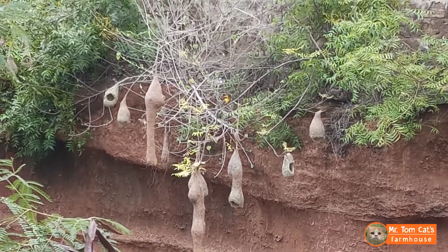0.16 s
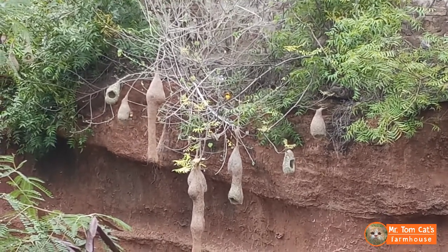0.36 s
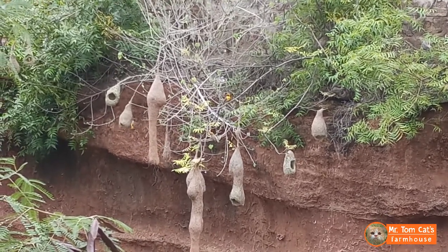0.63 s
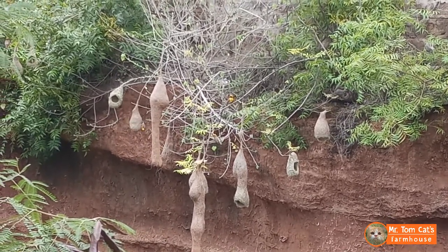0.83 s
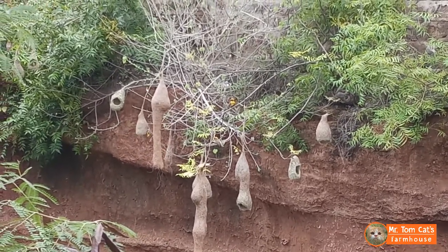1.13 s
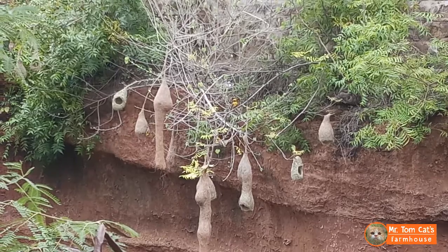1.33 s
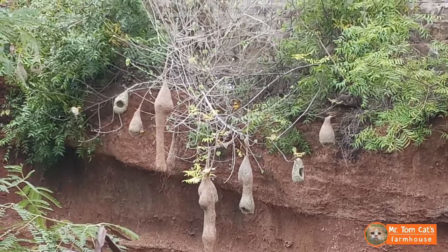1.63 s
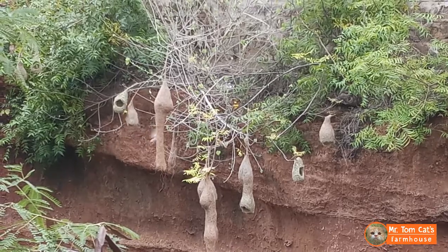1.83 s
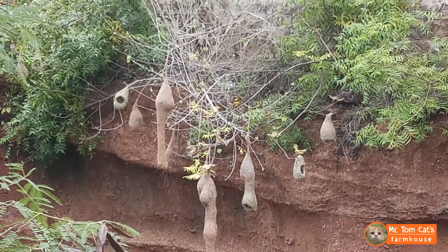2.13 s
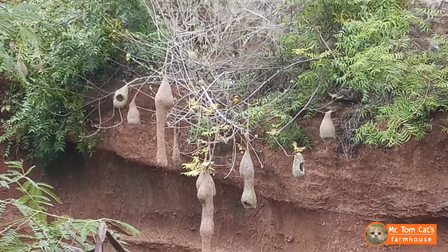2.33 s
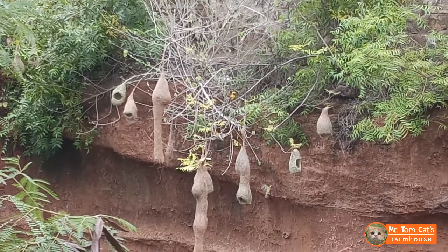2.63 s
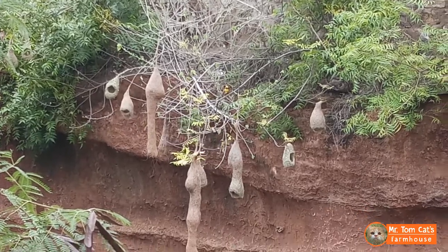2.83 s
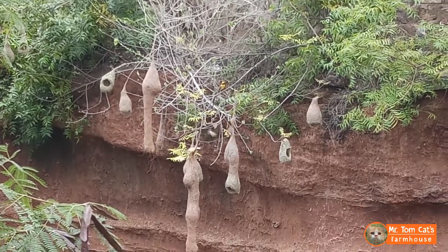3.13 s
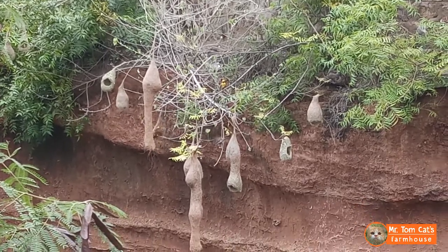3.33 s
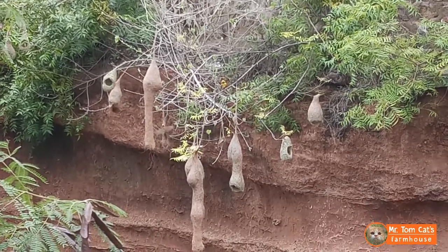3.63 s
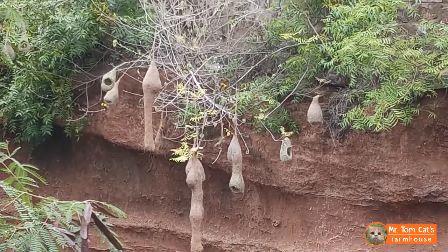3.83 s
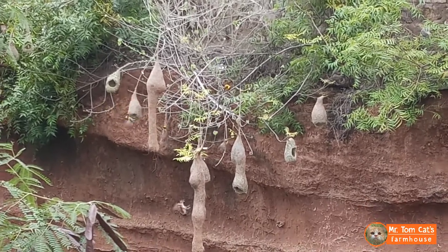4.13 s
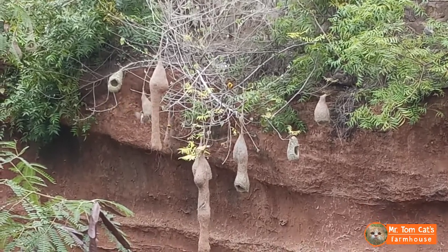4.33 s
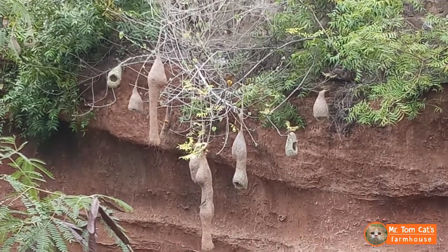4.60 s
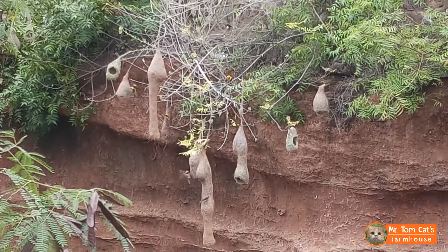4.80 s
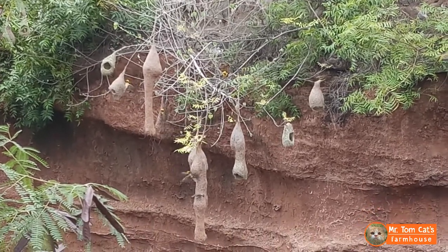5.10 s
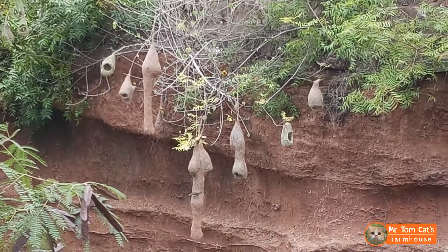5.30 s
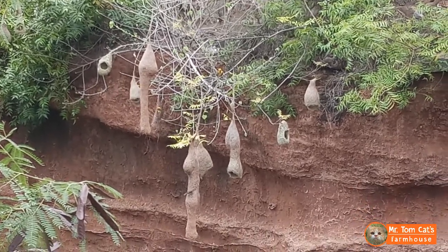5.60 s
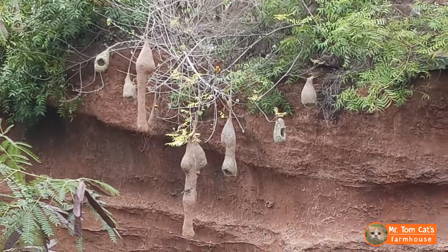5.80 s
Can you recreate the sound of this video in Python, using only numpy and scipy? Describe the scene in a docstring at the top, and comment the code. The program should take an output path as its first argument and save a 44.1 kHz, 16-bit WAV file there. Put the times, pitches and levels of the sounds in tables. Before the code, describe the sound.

After a faint, almost birdless opening, a small bird colony scolds in fast raspy notes, later adding sharp sliding whistles, with short outdoor echo.

```python
"""Weaver birds on a thorn bush scold in harsh chatter notes: stacks of partials that break into rasping noise.
Falling and rising whistles are frequency-modulated tones, roughened by fast random flutter.
Birds behind are a stream of similar chits over a low wash of noise.
Insects and leaves far off are shaped noise; light wind on the microphone is lumpy low noise, with one tick.
An earth bank and bushes return an echo: noise tails whose decay time depends on frequency."""
import sys
import numpy as np
from scipy import signal
from scipy.fft import rfft, irfft, next_fast_len
from scipy.io import wavfile
from scipy.ndimage import uniform_filter1d, map_coordinates

SR = 44100
rng = np.random.default_rng(int(sys.argv[2]) if len(sys.argv) > 2 else 0)


def file_out(sig):
    """Save sig as 16-bit WAV at sys.argv[1]."""
    # one column per channel
    cols = np.atleast_2d(sig).T
    # limit, then scale
    lim = np.clip(cols, -1, 1)
    pcm = np.round(lim * 32767).astype(np.int16)
    wavfile.write(sys.argv[1], SR, pcm)


N = 262395  # samples

# near chatter notes: (t/s, middle-band level/dB, starting f/Hz, low-band level/dB re middle, decay length/s)
CHATTER_NOTES = [(1.3603, -42, 3160, -3.5, 0.07), (1.398, -44.5, 3200, 6.5, 0.063),
                 (1.4384, -46.5, 3250, 11.5, 0.058), (1.4794, -47.5, 3260, 2, 0.042),
                 (1.515, -65, 3080, 6, 0.042), (1.586, -40.5, 3080, -4.5, 0.053),
                 (1.62, -46.5, 3080, -2.5, 0.081), (1.6645, -41.5, 3110, -3, 0.039),
                 (1.736, -28, 2980, -18, 0.044), (1.784, -26.5, 3190, -11, 0.055),
                 (1.865, -24, 3085, -15, 0.046), (1.915, -26, 3130, -14.5, 0.058),
                 (2.0037, -27.5, 3100, -12.5, 0.066), (2.06, -29.5, 2990, -12, 0.057),
                 (2.144, -28.5, 3110, -11, 0.071), (2.2007, -24, 3020, -16.5, 0.039),
                 (2.2814, -23.5, 3110, -15, 0.057), (2.3363, -21.5, 3163, -15, 0.047),
                 (2.426, -22, 3067, -14, 0.041), (2.473, -23.5, 2990, -13.5, 0.039),
                 (2.5753, -26, 3120, -12, 0.047), (2.629, -24.5, 3304, -9.5, 0.05),
                 (2.714, -26, 3086, -9, 0.049), (2.791, -27, 3054, -13.5, 0.042),
                 (2.847, -34, 2920, -23, 0.08), (2.888, -31.5, 3050, -8.5, 0.065),
                 (2.9944, -29.5, 3165, -10.5, 0.053), (3.043, -28, 3220, -11, 0.072),
                 (3.101, -28, 3050, -13, 0.051), (3.14, -30.5, 3010, -28, 0.034),
                 (3.22, -28, 3320, -13.5, 0.071), (3.272, -24.5, 3150, -11, .057),
                 (3.367, -26.5, 3130, -10.5, 0.051), (3.4697, -26.5, 3150, -11.5, 0.06),
                 (3.517, -40.5, 3270, 4.5, 0.085), (3.558, -25.5, 3240, -17, 0.038),
                 (3.633, -26, 3310, -11, 0.061), (3.694, -34.5, 3370, -2.5, 0.071),
                 (3.741, -35, 3370, -10, 0.085), (3.8414, -35.5, 3150, -3.5, 0.1),
                 (3.882, -27, 3370, -10, 0.017), (3.974, -35, 3100, -1.7, 0.076),
                 (4.035, -34, 3050, -7, 0.096), (4.077, -28, 3194, -11, 0.06),
                 (4.1925, -26.5, 3310, -8, 0.068), (4.244, -27.5, 3004, -6, 0.044),
                 (4.347, -35.5, 3245, -2.5, 0.14), (4.418, -40.5, 3160, 4, 0.12),
                 (4.4946, -28.5, 3280, -8, 0.061), (4.549, -41, 3370, 9, .049),
                 (4.595, -27, 3280, -7, 0.08), (4.632, -30.5, 3480, -3.5, .1),
                 (4.708, -24, 3400, -10, .053), (4.745, -28, 3300, -11, 0.061),
                 (4.886, -28.5, 3450, -19, 0.05), (4.935, -27, 3380, -4, .038),
                 (5.098, -28, 3220, -5.5, 0.041), (5.147, -38, 3000, -17, .071),
                 (5.364, -29, 2960, -11, 0.061), (5.4044, -30, 3640, 0.5, 0.06),
                 (5.4773, -22.5, 3640, -11.5, 0.093), (5.524, -28, 3370, -5.5, 0.055),
                 (5.586, -25.5, 3350, -37, 0.07), (5.6294, -29, 3350, -28, 0.051),
                 (5.788, -27, 3350, -11, 0.1), (5.856, -33, 3430, -22, 0.041), (5.9166, -32, 3370, -5, 0.1)]
# drift of the scolding voice: (t/s, treble level/dB re middle before dulling, hoarseness clipped to 0-1, rise/s)
VOICE_DRIFT = [(1.36, -32, 0.96, 0.0084), (1.44, -14, 0.68, .013), (1.58, -23.5, 0.97, 0.008),
               (1.68, -30, 0.87, 0.014), (1.73, -21.5, 0.37, 0.0025), (1.92, -25, 0.05, 0.0093),
               (2.03, -20.5, 0.63, 0.0053), (2.2, -23, 0.5, 0.0045), (2.28, -21.5, 0.52, .009),
               (2.42, -21, 0.66, 0.0015), (2.65, -23, 0.3, .005), (2.85, -20.5, 0.5, 0.0049),
               (3.15, -21, 0.59, 0.0082), (3.45, -31, 0.75, 0.012), (3.6, -19.5, 0.4, .008),
               (3.72, -24, 0.9, 0.013), (4.2, -22, 0.92, 0.013), (4.75, -18, 1.03, 0.011),
               (5.15, -12, 1.16, 0.011), (5.5, -21, 1, 0.0088), (5.63, -14.5, .9, 0.0091),
               (5.85, -16.5, 1.07, 0.012), (5.95, -14, 0.8, .01)]
FULL_S, DULLING_DB_PER_S = 0.044, 900  # a note shorter than this loses treble
LEAD_S = 0.005  # each note starts this long before its listed time


def chatter():
    """Near scolding by superposition of separate notes, their timbre interpolated through the bout."""
    track = np.zeros(N)
    for s, db, hz, low_db, length in CHATTER_NOTES:
        treble_db, hoarse, rise = curves(VOICE_DRIFT, s)
        treble_db = treble_db - DULLING_DB_PER_S * max(FULL_S - length, 0)
        add(track, s - LEAD_S, amp(db) * note(low_db, treble_db, hz, rise, length, hoarse))
    return track


# spectral colour of the voice: (f/Hz, relative level/dB)
VOICE_COLOUR = [(710, -88), (1200, -27), (2380, -17), (2650, -15), (3020, -14), (3820, -7.5), (4210, -2),
                (4940, -1), (5320, -3.5), (6320, -4), (6810, -10), (8260, -14.5), (9600, -28), (12000, -30),
                (15600, -42)]
# throat resonance: (centre f/Hz, width f/Hz, peak gain level/dB)
THROAT_RESONANCE = (5430, 146, 6.3)


def note(low_db, treble_db, hz, rise, length, hoarse):
    """Source and filter: a subharmonic stack drops in pitch, breaks into rasp and is coloured by a resonance."""
    t = np.arange(round(1.8 * length * SR) + 512) / SR
    hoarse = np.clip(hoarse, 0, 1)
    step = 1 / (1 + np.exp(-(t - 0.017) / 0.0021))
    cracked = 1 / (1 + np.exp(-(t - 0.012) / 0.0048))
    breaking = (1 - cracked) * hoarse ** 2.5 + cracked * (0.75 + 0.25 * hoarse)
    jitter = 1 + 0.0415 * breaking * wobble(498.6, size=len(t))
    pitch = hz * (1 - 0.15 * step - 0.8 * t) * jitter

    # the membranes repeat every third cycle, so lines stand a third of the pitch apart
    turns = np.cumsum(pitch / 3) / SR
    k = np.arange(2, 15)[:, None]
    line_db = np.where((k == 3) | (k == 6), 0, -7) + 5.25 * rng.standard_normal(k.shape)
    lines = amp(line_db) * np.sin(2 * np.pi * (k * turns + rng.random(k.shape)))
    stack = unit(np.sum(lines, axis=0))
    rasp = patchy(len(t), patchy_db=3.5, size=256) * amp(0.57 * wobble(306, size=len(t)))

    edge = hz * (0.57 + 0.25 * hoarse)  # a rasp does not drop as low as a clear note

    def low(f):
        return 1 / (1 + (f / 4000) ** 12)

    def treble(f):
        return 1 / (1 + (9300 / (f + 1)) ** 24)

    def middle(f):
        return 1 - low(f) - treble(f)

    def chest(f):  # gathered round the starting pitch
        return low(f) * bell(f, hz, 550, 8.6) / (1 + (edge / (f + 1)) ** 9)

    def colour(f):
        return amp(along(VOICE_COLOUR, f)) * bell(f, *THROAT_RESONANCE)

    # (band, level/dB, power share of rasp): the low band stays clearer than the overtones
    bands = [(chest, low_db, breaking * hoarse ** 1.65),
             (middle, 0, breaking),
             (treble, treble_db, breaking ** 0.47)]
    voice = np.zeros(len(t))
    for band, db, share in bands:
        source = np.sqrt(1 - share) * stack + np.sqrt(share) * rasp
        voice += amp(db) * unit(filtered(source, lambda f: band(f) * colour(f)))
    swell = 1 - np.exp(-t / max(rise, 0.001))
    return voice * swell * np.exp(-(t / length) ** 4.33)


# short whistles: (t/s, length/s, start f/Hz, middle f/Hz, end f/Hz, nominal peak level/dB,
#                  place of the peak 0-1, hoarseness 0-1)
SHORT_WHISTLES = [(.17, 0.17, 3500, 3500, 3470, -60, 0.46, 0.42),
                  (0.175, 0.1, 1800, 1750, 1740, -72, .5, 0.2), (0.254, 0.36, 900, 880, 908, -73.5, 1, .3),
                  (0.988, 0.085, 4750, 4490, 4230, -56, .3, .65),
                  (1.048, 0.12, 3900, 3580, 4330, -61, .3, .8),
                  (1.14, .06, 6500, 5280, 4500, -54, .25, .35),
                  (1.266, 0.093, 6800, 4180, 2770, -48.5, .6, 0.38),
                  (1.588, .02, 4940, 4200, 3614, -50, .2, 0.4),
                  (4.172, 0.055, 6337, 7660, 8770, -27.5, 0.32, 0.8),
                  (4.181, .045, 10800, 12100, 13300, -47, .7, .7),
                  (4.185, 0.022, 5620, 6300, 5900, -28, 0.5, 0.1),
                  (4.21, .05, 5800, 4900, 4900, -32, 0.6, .7),
                  (4.215, 0.072, 4480, 4445, 4470, -26, 0.5, 0.39),
                  (4.229, 0.053, 900, 940, 970, -62.5, 0.3, 0.4),
                  (4.343, 0.07, 6480, 4880, 4540, -32, 0.9, 0.66),
                  (4.353, .05, 6394, 6450, 6480, -27, 0.47, .3),
                  (4.486, 0.07, 5550, 5320, 5400, -31, 0.3, 0.7),
                  (4.499, 0.12, 4550, 4270, 3880, -28.5, 0.7, 0.58),
                  (4.59, 0.097, 5490, 5370, 5280, -25, 0.2, 0.3),
                  (4.703, 0.077, 5500, 5260, 5470, -25, 0.5, 0.57),
                  (4.74, .11, 4940, 4016, 3345, -23, 0.24, 0.67),
                  (4.875, .11, 6280, 4820, 4450, -25, 0.85, 0.36),
                  (4.89, 0.097, 4440, 3895, 3350, -27.5, 0.63, 0.53),
                  (5.072, 0.058, 6300, 7540, 8730, -30.5, 0.3, 0.87),
                  (5.137, 0.043, 5000, 5120, 5070, -25, .6, 0.5),
                  (5.248, 0.028, 6400, 6620, 6600, -30, 0.6, 0.26),
                  (5.352, 0.08, 6300, 5330, 5210, -28, 0.56, 0.6),
                  (5.366, 0.11, 4840, 4320, 4120, -23, 0.52, 0.68),
                  (5.81, 0.15, 3920, 4450, 4096, -25.5, 0.7, 0.48),
                  (5.83, 0.048, 5910, 6040, 6300, -26.5, 0.36, .4),
                  (5.864, 0.087, 6500, 5900, 5300, -20, 0.37, .5),
                  (5.889, .06, 4300, 3860, 3500, -28.5, 0.54, 0.7)]
# two long falling whistles, each a list of (t/s, f/Hz, nominal level/dB, hoarseness 0-1)
LONG_WHISTLES = [
    [(5.01, 7150, -31, 0.07), (5.038, 6792, -28.5, 0.31), (5.104, 4830, -23.5, 0.4),
     (5.124, 4714, -16, 0.22), (5.215, 3777, -16.5, 0.39), (5.235, 3560, -27.5, 0.4),
     (5.265, 3245, -25.5, .3)],
    [(5.49, 6870, -49, 0.16), (5.518, 6508, -19.5, 0.24), (5.546, 5830, -24, 0.33), (5.59, 4670, -16, 0.17),
     (5.67, 3930, -16, 0.23), (5.715, 3540, -21, 0.37), (5.74, 3440, -28.5, 0.5)],
]


def whistles():
    """Frequency modulation makes the glide; random amplitude modulation spreads a hoarse tone into a band."""
    track = np.zeros(N)
    for rows in LONG_WHISTLES + [glide(*row) for row in SHORT_WHISTLES]:
        t = np.arange(rows[0][0], rows[-1][0], 1 / SR)
        hz, db, hoarse = curves(rows, t)
        hoarse = np.clip(hoarse, 0, 1)
        hz = uniform_filter1d(hz, size=400, mode="nearest")
        hz = hz * (1 + 0.0216 * hoarse * wobble(115.1, size=len(t)))
        edges = np.clip(np.minimum(t - t[0], t[-1] - t) / 0.0017, 0, 1)
        flutter = np.sqrt(1 - hoarse ** 2) + 1.46 * hoarse * wobble(540.1, size=len(t))
        phase = 2 * np.pi * np.cumsum(hz) / SR
        tone = np.sin(phase) + amp(-36) * np.sin(2 * phase)
        level = amp(db + 1.33 * wobble(98.0, size=len(t)))
        add(track, t[0], level * edges * flutter * tone)
    return track


BELOW_PEAK_DB = 8.5  # how far a short whistle's far end lies under its peak


def glide(s, length, start_hz, middle_hz, end_hz, db, place, hoarse):
    """Quadratic frequency glide through three points; the level climbs to its peak and falls away."""
    u = np.linspace(0, 1, num=9)
    bend = np.polyfit([0, 0.5, 1], [start_hz, middle_hz, end_hz], deg=2)
    hz = np.polyval(bend, u)
    place = np.clip(place, 0, 1)
    level_db = db - BELOW_PEAK_DB * np.abs(u - place) / max(place, 1 - place)
    return np.transpose([s + length * u, hz, level_db, hoarse + 0 * u])


# birds farther back, before the mix gain: (t/s, chit level/dB, low wash level/dB)
FLOCK_LEVELS = [(1.36, -52, -65), (1.61, -64, -64), (1.72, -53, -58), (1.78, -28.5, -61), (1.91, -49, -61),
                (2.45, -34, -65.5), (3.0, -40, -62), (3.63, -30.5, -56), (4.02, -34.5, -55),
                (4.3, -36, -56.5), (4.55, -27.5, -55), (4.75, -32, -65), (5.1, -31, -67),
                (5.33, -32.5, -63), (5.45, -35, -71), (5.75, -31, -65), (5.95, -30, -76)]
WASH_COLOUR = [(700, -33), (1200, -21), (1700, -5.5), (2300, -0.5), (3200, -55)]  # (f/Hz, relative level/dB)


def flock():
    """Incoherent superposition: many chits at loose intervals form an evened stream over a low wash of noise."""
    track, t = np.zeros(N), np.arange(N) / SR
    first_s, spacing_s = FLOCK_LEVELS[0][0], 0.042
    for i, (late, size, pitch, long) in enumerate(rng.random((110, 4))):
        chit = note(-11, -18.5, 2200 + 1200 * pitch, 0.015, 0.026 + 0.027 * long, 0.826)
        add(track, first_s + (i + late) * spacing_s, amp(1.9 * size) * chit)
    power = np.abs(uniform_filter1d(track ** 2, size=SR // 4))
    even = track / np.sqrt(power + 1e-9)
    chits_db, wash_db = curves(FLOCK_LEVELS, t)
    wash = rush(WASH_COLOUR, patchy_db=4, size=256)
    return (amp(chits_db) * even + amp(wash_db) * wash) * (t > first_s)


# echo of bank and bushes: (f/Hz, 60 dB decay time t/s)
ECHO_DECAY = [(1500, 0.81), (5000, 0.34), (12000, 0.37)]


def bank(x):
    """Diffuse reflection by convolution with decaying noise; moving leaves renew the paths block by block."""
    out, step = np.zeros(N), SR // 6
    fade = np.sqrt(np.hanning(2 * step))
    padded = np.pad(x, (0, 2 * step))
    for start in range(0, N, step):
        hz, t, z = signal.stft(rng.standard_normal(SR // 3), SR, nperseg=256)
        decay = amp(-60 * t / along(ECHO_DECAY, hz)[:, None])
        tail = signal.istft(z * decay, SR, nperseg=256)[1]
        block = fade * padded[start:start + 2 * step]
        add(out, start / SR + 0.004, signal.fftconvolve(block, tail / np.linalg.norm(tail)))
    return out


# wind at the microphone: (t/s, thud level/dB, flutter level/dB before its random waver)
WIND_LEVELS = [(0.0, -44.5, -60.5), (.9, -45, -56), (1.25, -51.5, -56), (1.45, -46, -59.5), (2.0, -48, -54),
               (2.6, -51, -65), (2.75, -47, -54), (2.95, -49, -63), (3.75, -54, -68.5), (4.1, -46, -61),
               (4.95, -53, -67.5), (5.15, -46.5, -68), (5.95, -45.5, -64)]
# spectral colour of the wind: (f/Hz, relative level/dB)
GUST_COLOUR = [(12, -60), (20, -24), (43, -5.5), (81, -0.5), (135, 7), (195, -5.5), (231, -13), (270, -12),
               (312, -18), (600, -39), (780, -48), (1320, -120)]


def wind():
    """Turbulent pressure on the microphone port: patchy noise split near 220 Hz into thud and flutter."""
    thud_db, flutter_db = curves(WIND_LEVELS, np.arange(N) / SR)
    gust = rush(GUST_COLOUR, patchy_db=3, size=2048)
    thud = filtered(gust, lambda f: 1 / (1 + (f / 220) ** 8))
    flutter_level = amp(flutter_db + 2.4 * wobble(6.4, size=N))
    return amp(thud_db) * unit(thud) + flutter_level * unit(gust - thud)


# spectral colour of insects and leaves: (f/Hz, relative level/dB)
HILLSIDE_COLOUR = [(240, -12), (400, -10.5), (596, -14.5), (860, -15.5), (929, -17), (1520, -13),
                   (1770, -11), (2760, -15.5), (3410, -15), (3920, -11.5), (7930, -6.5), (9380, -29.5),
                   (15600, -39)]
# far shrill hiss of insects: (t/s, level/dB)
INSECT_LEVELS = [(0.0, -59), (.2, -55.5), (.45, -59.5), (1.3, -54.5)]
LEAVES_DB, LEAVES_WAVER_DB = -71, 1.5  # mean level, size of its random waver
LEAVES_FOLLOW = 0.2  # dB of leaves per dB of wind flutter


def hillside():
    """Band-divided noise: leaves lie below about 1700 Hz and follow the wind, insects lie above."""
    t = np.arange(N) / SR
    flutter_db = curves(WIND_LEVELS, t)[1]
    hiss = rush(HILLSIDE_COLOUR, patchy_db=3.0, size=1024)
    leaves = filtered(hiss, lambda f: 1 / (1 + (f / 1700) ** 8))
    follow_db = LEAVES_FOLLOW * (flutter_db - flutter_db.mean())
    leaves_db = LEAVES_DB + follow_db + LEAVES_WAVER_DB * wobble(1.25, size=N)
    return amp(leaves_db) * unit(leaves) + amp(curves(INSECT_LEVELS, t)[0]) * unit(hiss - leaves)


# tick of the microphone housing: (t/s, level/dB that scales its two parts)
HOUSING_TICK = [(5.778, -39.5)]


def tick():
    """Impulse response of the housing: a damped 500 Hz mode with a burst of bright noise."""
    track = np.zeros(N)
    t = np.arange(SR // 50) / SR
    for s, db in HOUSING_TICK:
        mode = np.sin(2 * np.pi * 500 * t + 0.55) * np.exp(-t / 0.001)
        bright = np.diff(rng.standard_normal(len(t) + 2), n=2) * np.exp(-t / 0.0008)
        add(track, s, amp(db) * mode)
        add(track, s, amp(db + 5) * bright)
    return track


def rush(spectrum, patchy_db, size):
    """Spectral shaping of patchy noise, normalised to rms 1."""
    return unit(filtered(patchy(N, patchy_db, size), lambda hz: amp(along(spectrum, hz))))


def patchy(length, patchy_db, size):
    """Time-frequency modulation of white noise by random gain; a larger size makes patches narrower, longer."""
    z = signal.stft(rng.standard_normal(length + size), nperseg=size)[2]
    field = uniform_filter1d(rng.standard_normal(z.shape), size=3, axis=0)
    field = uniform_filter1d(field, size=6, axis=1)
    return unit(signal.istft(z * amp(patchy_db * unit(field)), nperseg=size)[1][:length])


def bell(hz, centre_hz, width_hz, db):
    """Resonance curve: gain peaks at the centre and returns to unity on both sides."""
    return amp(db / (1 + ((hz - centre_hz) / width_hz) ** 2))


def wobble(rate, size):
    """Band-limited random modulation: a smooth curve through random knots, rate of them a second."""
    knots = rng.standard_normal(int(size * rate / SR) + 4)
    return map_coordinates(knots, [np.arange(size) * rate / SR])


def filtered(x, response):
    """Linear filtering: the spectrum of x times a response of frequency."""
    m = next_fast_len(len(x) + 2048)
    return irfft(rfft(x, m) * response(np.fft.rfftfreq(m, 1 / SR)), m)[:len(x)]


def amp(db):
    """Decibel law: level in dB to amplitude gain."""
    return 10 ** (np.asarray(db) / 20)


def unit(x):
    """Normalisation to rms 1."""
    return x / np.sqrt(np.mean(x ** 2) + 1e-20)


def along(points, hz):
    """Interpolation of (f/Hz, value) points on a logarithmic frequency axis."""
    f, v = np.transpose(points)
    return np.interp(np.log(hz + 1), np.log(f + 1), v)


def curves(rows, t):
    """Linear interpolation in time of each column after the first."""
    s, *cols = np.transpose(rows)
    return [np.interp(t, s, c) for c in cols]


def add(track, s, sound):
    """Superposition of a sound on the track from s seconds."""
    part = track[round(s * SR):][:len(sound)]
    part += sound[:len(part)]


def scene():
    """Superposition of birds, their echo, wind, hillside and tick."""
    near, song, far = chatter(), whistles(), flock()
    echo = bank(amp(-7) * near + amp(-4) * song + amp(-4.5) * far)
    return (near + song + amp(-5.5) * far + echo + wind() + hillside() + tick())[None]


# steep-sided treble notch of the microphone: (centre f/Hz, width f/Hz, gain level/dB)
TREBLE_NOTCH = (9610, 620, -6)
TOP_HZ = 15830  # band limit


def record(dry):
    """Transducer response: a steep-sided treble notch, and nothing from the band limit upward."""
    centre_hz, width_hz, db = TREBLE_NOTCH

    def response(hz):
        notch = amp(db / (1 + ((hz - centre_hz) / width_hz) ** 6))
        return notch * (hz < TOP_HZ)

    return filtered(dry[0], response)[None]


dry = scene()
out = record(dry)
file_out(out)
```